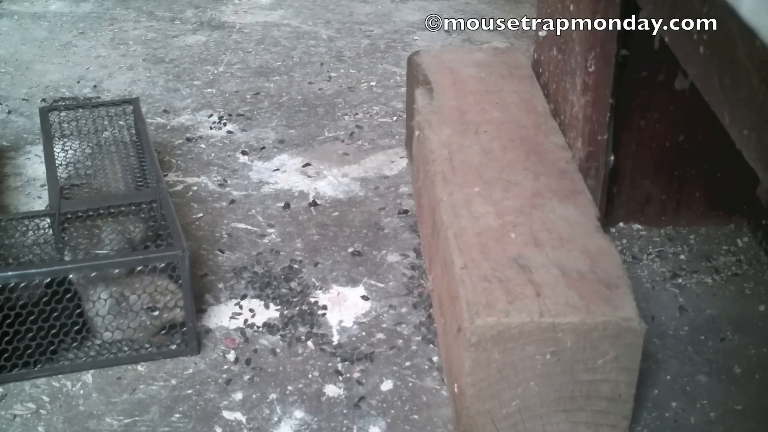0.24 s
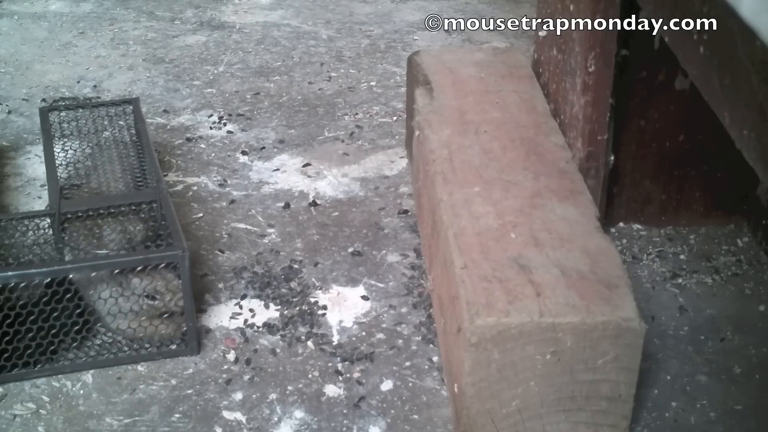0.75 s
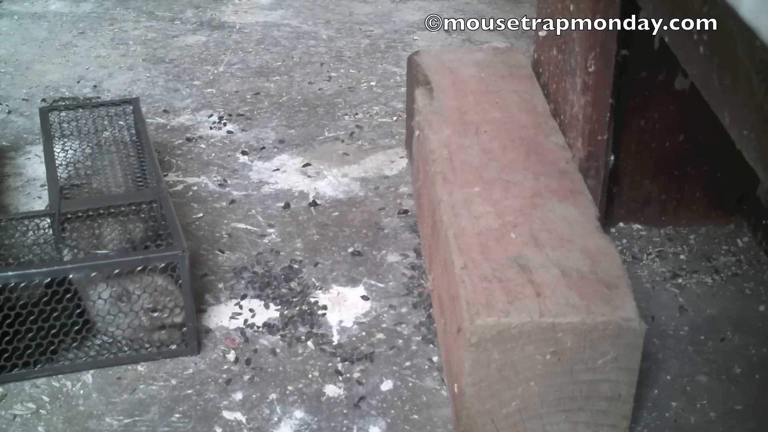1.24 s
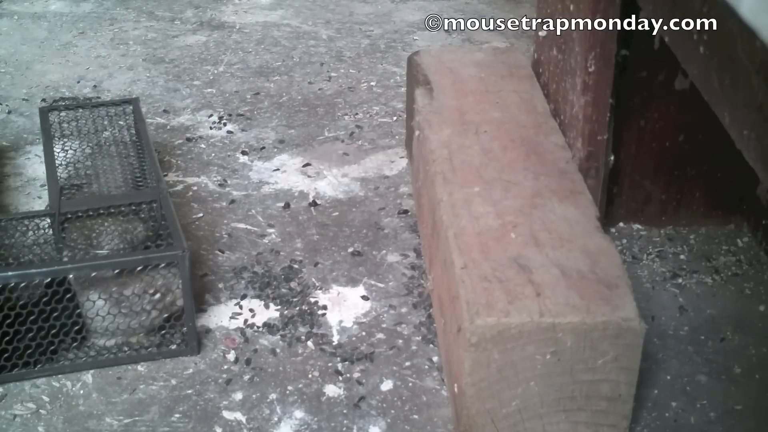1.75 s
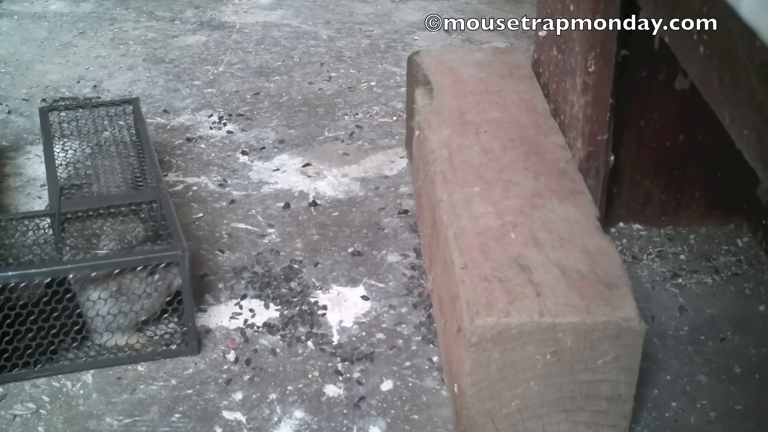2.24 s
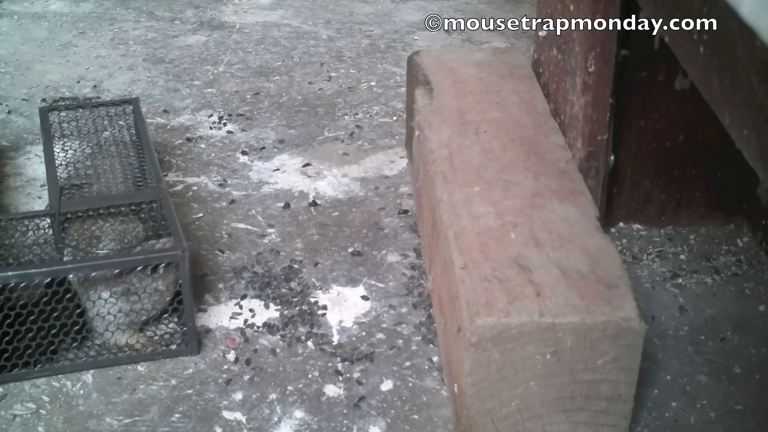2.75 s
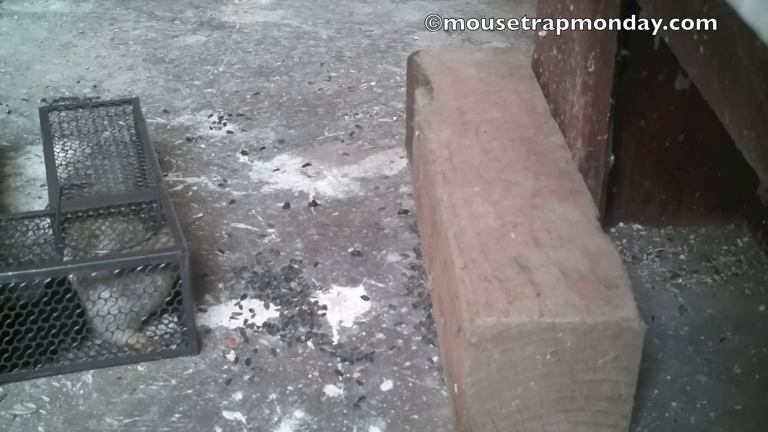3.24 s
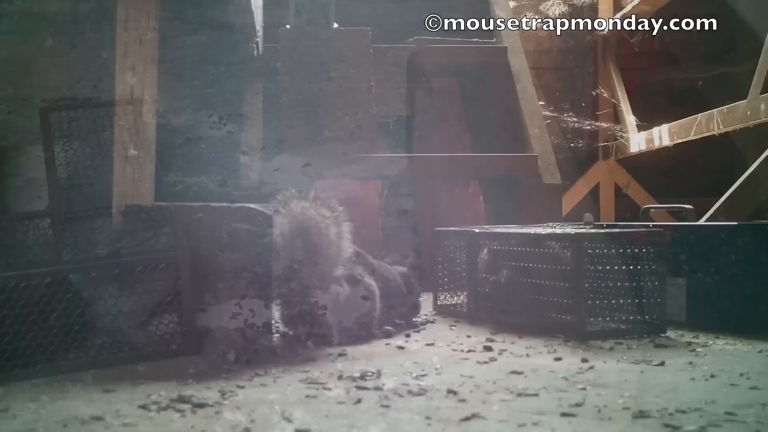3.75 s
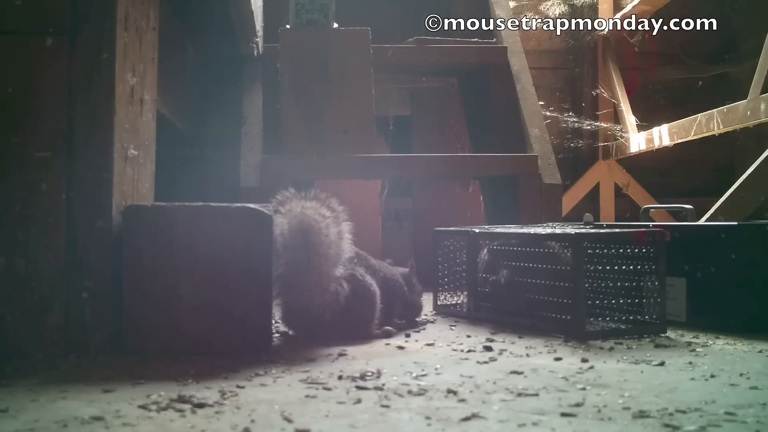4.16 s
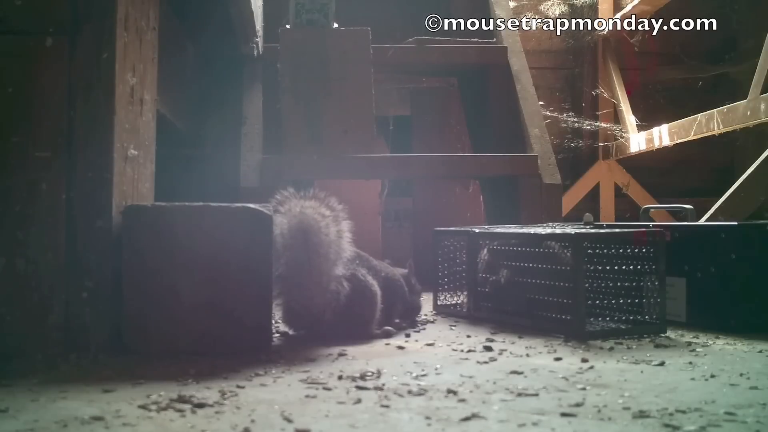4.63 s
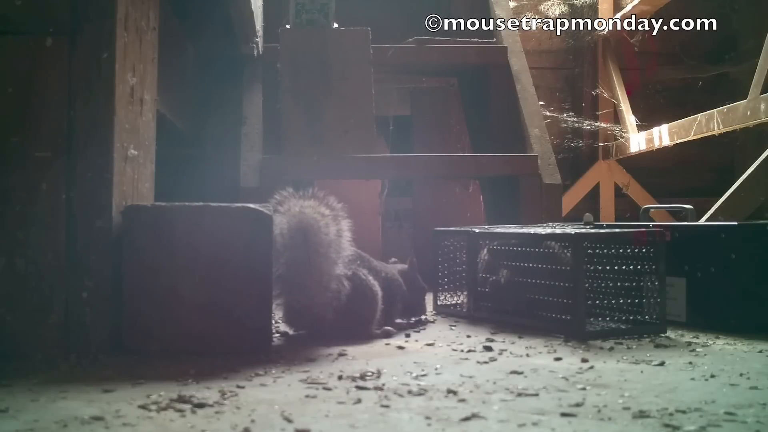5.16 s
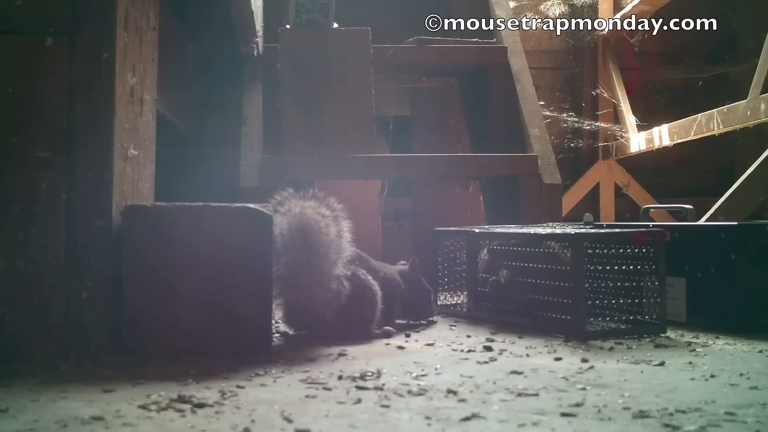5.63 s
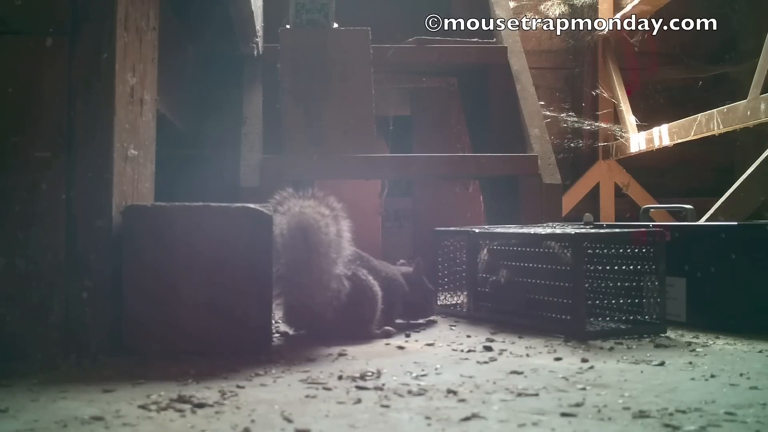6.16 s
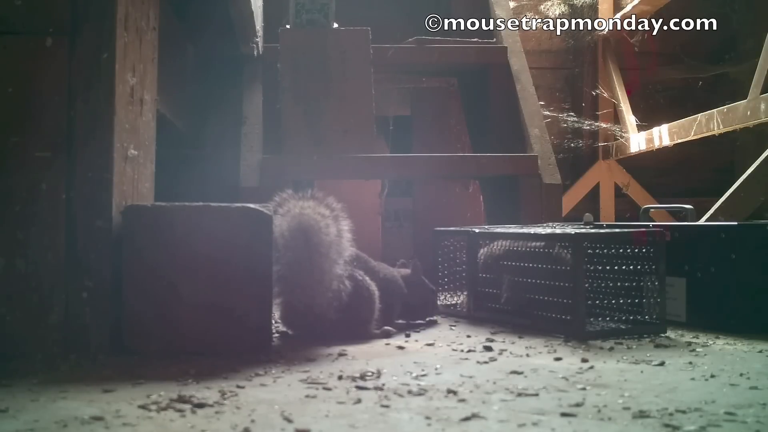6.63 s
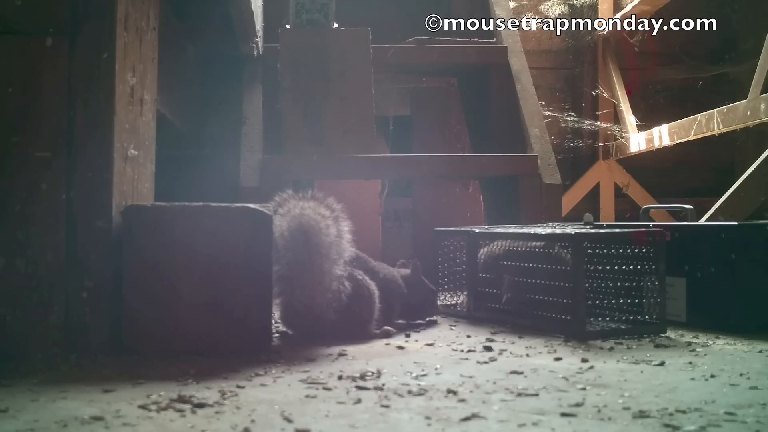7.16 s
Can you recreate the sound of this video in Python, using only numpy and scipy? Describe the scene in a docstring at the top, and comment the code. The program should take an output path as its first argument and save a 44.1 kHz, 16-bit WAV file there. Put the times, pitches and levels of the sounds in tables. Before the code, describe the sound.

A squirrel claws and rattles inside a wire-mesh trap in a barn, then another nibbles seeds over a faint engine hum and squeaks once sharply.

```python
"""Claws are heard first: a squirrel scrabbles in a wire-mesh trap, scratching mesh, ringing frame, thudding floor.
Noise bursts excite the spectra and damped modes of mesh, wires, frame and floor plate.
Then a squirrel nibbles seeds (noise snaps and stick-slip rasp) while a far engine hums as a few sine partials.
It gives one sharp squeak, a stepped tone with overtones. Decaying noise gives the barn's reverberation;
rumble and hiss lie beneath, and a limiter flattens the peaks."""
import sys
import numpy as np
from scipy import signal
from scipy.fft import rfft, irfft, next_fast_len
from scipy.io import wavfile
from scipy.ndimage import uniform_filter1d, minimum_filter1d, map_coordinates

SR = 44100
rng = np.random.default_rng(int(sys.argv[2]) if len(sys.argv) > 2 else 0)


def store_wav(level_fs):
    """Save 16-bit WAV to argv[1]."""
    pcm = np.round(np.clip(np.atleast_2d(level_fs), -1, 1) * 32767)
    wavfile.write(sys.argv[1], SR, pcm.T.astype(np.int16))


N = 325899  # samples

# Levels in the tables are relative: each source's mix gain follows in its function.
# Paw contacts: [t/s, grip level/dB, extra weight below 2.2 kHz/dB, slide/s]
PAW_CONTACTS = [(0.0, -51, 2, 0.0019), (0.0205, -49.5, -1.5, 0.0029), (0.051, -42, 0, 0.012),
                (0.1649, -49.5, -6, 0.0017), (0.185, -50, 3, 0.0029), (0.240, -41, 4, 0.02),
                (0.3034, -50.5, -2, 0.002), (0.343, -51, 1, 0.011), (0.365, -46.5, 2, .002),
                (0.4805, -66.5, 12.5, 0.0018), (0.544, -50, -8, 0.0021), (0.5619, -50, 2, .02),
                (0.6118, -41, -5.5, 0.0059), (0.645, -42.5, 2, .015), (0.7237, -52, 7.5, .012),
                (0.759, -49.5, 3, 0.0033), (0.7752, -43, 4, .002), (0.8282, -45.5, -3, 0.0033),
                (0.9043, -47.5, -2, 0.0095), (0.942, -37.5, -4, 0.00094), (1.0078, -45, -1.5, 0.0049),
                (1.0628, -46.5, -7, 0.0085), (1.109, -49, -4, 0.0041), (1.124, -49, 4, .002),
                (1.156, -41, -3, .008), (1.2009, -44.5, 0, 0.0011), (1.275, -52.5, 3, 0.0022),
                (1.3088, -44.5, 1.5, 0.0087), (1.3821, -55.5, 4.5, 0.0083), (1.745, -39, 4, .013),
                (2.0348, -62, -1.5, .002), (2.0637, -64, 0, 0.0017), (2.1165, -45, -1.5, .007),
                (2.388, -62.5, -15, 0.0077), (2.4539, -70, -1, 0.0019), (2.495, -56.5, 8, 0.018),
                (2.5806, -49.5, 0, 0.0021), (2.6762, -51.5, -14, 0.022), (2.738, -50, 6, 0.012),
                (2.775, -51.5, 4.5, 0.0028), (2.9352, -36, 1, 0.00092), (3.317, -58, 10.5, 0.0021),
                (3.347, -49.5, 5, 0.016), (3.4989, -57.5, 6.5, 0.011), (3.712, -59, 2.5, .004)]
# Spells of light brushing on the mesh: [start t/s, end t/s, middle level/dB]
BRUSHING_SPELLS = [(0, 1.401, -64), (1.4, 3.701, -74.5)]
# Spectral density of the wire mesh: [f/Hz, level/dB per Hz]
MESH_SPECTRUM = [(880, -45), (1500, -9.5), (1920, -19.5), (2150, -15), (2400, -15.5), (2750, -9),
                 (3800, -9.5), (5670, -3.5), (6250, -0.5), (7820, -6.5), (9140, -14), (14300, -32.5),
                 (15500, -27.5)]
# Damped modes of single wires: [f/Hz, width/Hz, level/dB]
WIRE_MODES = [(2810, 59, -6), (3300, 28, 2), (3467, 42, 3), (5340, 520, -3.5), (6340, 320, 2),
              (7590, 115, -5), (7940, 290, -15.5), (7720, 73, -30)]
# Damped modes of the steel frame: [f/Hz, width/Hz, level/dB]
FRAME_MODES = [(358, 19, -6.5), (425, 27, -9), (547, 44, -9), (884, 35, -5), (1298, 59, 0), (1545, 53, -11),
               (1720, 77, -5.5), (2160, 240, -4.5), (2660, 190, -11)]
# Landings of the body on the floor plate: [t/s, level/dB, extra depth at 245 Hz/dB]
LANDINGS = [(1.756, -52.5, 10.5), (2.123, -56, 4), (2.505, -61, 6), (2.587, -55, -3), (2.755, -57, 6),
            (2.94, -48.5, -5), (3.311, -59, 3), (3.36, -55, -4.5), (3.506, -61.5, 6.5), (3.713, -71, 6)]
# Spectral density of the floor plate: [f/Hz, level/dB per Hz]
FLOOR_SPECTRUM = [(150, -54.5), (205, -14), (242, -3.5), (285, -9), (335, 4.5), (420, -8), (470, -10.5),
                  (700, -19), (880, -12.5), (1100, -20.5), (3000, -36.5)]
# Cracking seed husks: [t/s, level/dB, crisp top relative to it/dB]
HUSK_CRACKS = [(3.9808, -52, -27), (4.165, -51, -14), (4.1712, -45, -9), (4.2098, -52, -22),
               (4.3126, -48, -16), (4.401, -42.5, -29), (4.446, -46.5, -17), (4.6265, -49, -10.5),
               (4.934, -43, -22), (4.9698, -39.5, -17), (5.002, -44.5, -16.5), (5.2829, -47, -19),
               (5.458, -48.5, -11), (5.5598, -47, -18), (5.8256, -45, -15), (6.6228, -43, -21.5),
               (6.8768, -51.5, -20), (6.988, -42.5, -28), (7.1852, -44, -24)]
# Spectral density of a husk snap: [f/Hz, level/dB per Hz]
HUSK_SPECTRUM = [(1470, -60.5), (2500, -18), (4790, -8), (5080, -15), (5390, -2), (5910, -10.5),
                 (6600, 1.5), (7780, -2), (8590, -9.5), (12000, -20), (15600, -37), (22000, -120)]
# Bouts of gnawing: [start t/s, end t/s, level/dB]
GNAWING_BOUTS = [(3.976, 3.998, -67.5), (4.343, 4.505, -70), (4.545, 4.65, -71.5), (4.803, 5.02, -72),
                 (5.127, 5.295, -72), (5.791, 5.825, -65), (5.903, 6.07, -67), (6.119, 6.339, -68.5),
                 (6.749, 6.772, -66), (6.979, 7.019, -66.5), (7.207, 7.247, -66.5)]
# Spectral density of teeth on seed: [f/Hz, level/dB per Hz]
RASP_SPECTRUM = [(2500, -29), (3500, -17), (4800, -11), (5500, -6), (6500, -1.5), (7400, -1.5), (8100, -12),
                 (9500, -19.5), (13000, -28)]
# Damped modes of the gnawed seed: [f/Hz, width/Hz, level/dB]
SEED_MODES = [(5660, 236, -1.5), (6800, 450, -2), (7300, 480, -4)]
# Bits dropping on the floor: [t/s, level/dB]
FALLING_CRUMBS = [(4.211, -80), (5.019, -73), (5.831, -67)]
# Overtones of the squeak: [multiple of the fundamental, level/dB]
SQUEAK_OVERTONES = [(2, -23.5), (3, -7), (4, -25)]
# Level course of the far engine: [t/s, level/dB]
ENGINE_LEVEL = [(3.68, -76), (3.86, -66.5), (4.2, -57), (5.65, -59), (5.87, -64.5), (6.8, -67), (7.39, -74)]
# Partials of the engine drone: [f/Hz, level/dB]
ENGINE_PARTIALS = [(112.5, 1.5), (225, -20.5), (295, -14), (333, -30.5), (450, -21.5)]
# Spectral density of the barn's quiet by the trap: [f/Hz, level/dB per Hz]
TRAP_AIR_SPECTRUM = [(12, -9), (20, -0.5), (47, -2.5), (166, -21), (207, -22.5), (306, -19.5), (342, -13),
                     (631, -30), (1270, -31), (3540, -39), (6190, -32), (7110, -35), (8400, -36),
                     (15500, -41.5)]
# Spectral density of the barn's quiet by the seeds: [f/Hz, level/dB per Hz]
SEED_AIR_SPECTRUM = [(12, -37), (20, 6.5), (122, -6), (144, -14), (171, -12), (225, -13.5), (452, -25),
                     (534, -22), (746, -24.5), (811, -26), (932, -26), (1580, -31.5), (5090, -33.5),
                     (10800, -28.5), (15500, -35.5)]
# Reverberation time of the barn: [f/Hz, t60/s]
BARN_T60 = [(200, 0.31), (1000, 1), (3600, 0.7), (5000, 0.55), (7000, 0.51), (14000, 0.24)]

TOP_HZ = 15500  # band limit
TRAP_AIR_DB, SEED_AIR_DB = -61.5, -63
TOUCH_DB = -2.5  # the first touch, against the grip
DRAG_S, DRAG_PER_SLIDE = .0015, .2  # swell of a contact, and its lengthening per second of slide
CLAW_T60_S = .11  # decay of a scratch
RATTLE_S, RATTLE_SPREAD_S = 0.021, .04  # delay of the mesh's knock-back, and its random extra
FIRM_DB = -43  # a firm grip, the reference for the knock-back
RATTLE_DB, RATTLE_WEIGHT_DB = -58.5, 7  # knock-back after a firm grip; its added weight makes it duller
RATTLE_FOLLOWS = .4  # dB of knock-back per dB of grip: the mesh has little play
CRISP_DB, CRISP_PER_WEIGHT = 0.5, 0.19  # claw treble at 11 kHz, and its gain per dB of weight
BRUSH_RANGE_DB, BRUSH_SHAKE_DB = 17, 8  # range of brush levels; their drive of the frame
SETTLE_S, SETTLE_DB = .06, -11  # the weight settles after each landing
STROKES_PER_S, STROKE_DEPTH_DB = 14.83, 8.5  # tooth strokes, and the fall in level through each
CHIP_DB, CHIP_SPREAD_DB, CHIP_TOP_DB = -58, 2.5, -17.5  # chip level, scatter, relative crisp top
SQUEAK_S, SQUEAK_LENGTH_S, SQUEAK_DB = 6.351, 0.061, -14.5  # start, length, reference level
SQUEAK_ATTACK_S, SQUEAK_RELEASE_S = .005, 0.0067
LOW_HZ, HIGH_HZ = 3434, 3730  # mean pitches of the two steps
STEP_AFTER_S, STEP_GLIDE_S = .0215, .0042  # centre of the pitch step, and time constant of its glide
MOUTH_LEAD_S, WHISPER_DB = .011, -40  # the mouth opens first, with a faint whistle


def cage():
    """Forced vibration: paw contacts excite mesh and wires, and the frame stores the shaking longer."""
    brushes = fidget()
    mesh = colour(brushes, MESH_SPECTRUM)
    chatter = np.zeros(N)
    shake = amp(BRUSH_SHAKE_DB) * brushes
    hz = np.linspace(300, TOP_HZ, num=90)
    tick_treble_db = along([(5000, 0), (13000, 6)], hz)
    for s, db, weight_db, drag in contacts():
        crisp_db = CRISP_DB + CRISP_PER_WEIGHT * weight_db
        scratch = amp(db) * burst(rise=drag, t60=CLAW_T60_S, grain_db=1.0)
        sudden = np.exp(-drag / 0.0026)  # a quick claw starts with a hard tick
        tick = amp(db + 2) * sudden * burst(rise=.0008, t60=.035, grain_db=2)
        touch_db = along([(2200, weight_db), (6000, 0), (11000, crisp_db)], hz)
        patch_db = 3.6 * rng.standard_normal(len(hz))  # every patch favours other wire modes
        tone = along(MESH_SPECTRUM, hz) + touch_db + patch_db
        add(mesh, s, amp(-1.5) * colour(scratch, np.c_[hz, tone], size=2048))
        add(mesh, s + 0.0011, colour(tick, np.c_[hz, tone + tick_treble_db], size=2048))
        add(mesh, s + drag, amp(db - 2.5) * pluck(t60=0.071))
        add(chatter, s, scratch)
        add(shake, s, amp(db + weight_db) * burst(rise=0.011, t60=0.21, grain_db=3.0))
    return mesh + amp(-8) * ring(chatter, WIRE_MODES) + amp(-22) * frame(shake)


def contacts():
    """Impact sequence: a paw touches, slides and grips, then the mesh knocks back: (s, dB, weight dB, drag s)."""
    for (s, db, weight_db, slide), chance in zip(PAW_CONTACTS, rng.random(len(PAW_CONTACTS))):
        drag = DRAG_S + DRAG_PER_SLIDE * slide
        yield s, db + TOUCH_DB, weight_db, drag
        yield s + slide, db, weight_db, drag
        knock_s = s + slide + RATTLE_S + RATTLE_SPREAD_S * chance
        knock_db = RATTLE_DB + RATTLE_FOLLOWS * (db - FIRM_DB)
        yield knock_s, knock_db, weight_db + RATTLE_WEIGHT_DB, drag


def fidget(count=28):
    """Light friction: short noise bursts of random time and level fill each brushing spell."""
    touches = np.zeros(N)
    for start, end, db in BRUSHING_SPELLS:
        for when, strength in rng.random((count, 2)):
            brush = burst(rise=.003, t60=0.06, grain_db=3.5)
            brush_db = db + BRUSH_RANGE_DB * (strength - .5)
            add(touches, start + when * (end - start), amp(brush_db) * brush)
    return touches


def pluck(t60, count=9):
    """Free vibration: a few wires of unequal pitch, released at once, decay together."""
    t = np.arange(SR // 8) / SR
    hz = np.clip(5600 * np.exp(0.27 * rng.standard_normal((count, 1))), 2400, 12000)
    size = amp(.5 * along(MESH_SPECTRUM, hz) + rng.normal(0, 4.5, hz.shape))
    waves = size * np.sin(2 * np.pi * (hz * t + rng.random(hz.shape)))
    envelope = amp(-60 * t / t60) * (1 - np.exp(-t / 0.00024))
    return waves.sum(0) / np.linalg.norm(size) * envelope


def frame(shake):
    """Modal resonance: the shaken steel frame rings in modes whose levels wander independently."""
    modes = np.zeros(N)
    for hz, width, db in FRAME_MODES:
        modes += amp(db + 2.54 * wobble(13)) * ring(shake, [(hz, width, 0)])
    low_cut = signal.butter(4, 260, "highpass", fs=SR, output="sos")
    return signal.sosfilt(low_cut, modes)  # thin bars radiate no bass


def thumps():
    """Plate radiation: the floor plate booms under the landing weight; a flat landing sounds deeper."""
    plate = np.zeros(N)
    hz, plate_db = np.transpose(FLOOR_SPECTRUM)
    for s, db, depth_db in LANDINGS:
        tone = np.c_[hz, plate_db + along([(190, 0), (245, depth_db), (350, 0)], hz)]
        for delay, loss_db in [(0, 0), (SETTLE_S, SETTLE_DB)]:
            blow = burst(rise=0.004, t60=0.36, grain_db=0.5)
            add(plate, s + delay, amp(db + loss_db) * colour(blow, tone, size=4096))
    return plate


def nibbling():
    """Fracture and stick-slip: husks snap in brief bursts over a resonant rasp; a few bits drop."""
    snaps, crisp, drops = np.zeros(N), np.zeros(N), np.zeros(N)
    for s, db, top_db in [*HUSK_CRACKS, *chips()]:
        add(snaps, s, amp(db - 12.5) * burst(rise=0.00026, t60=0.03, grain_db=-1))
        splinter = burst(rise=.0002, t60=.014, grain_db=3)
        add(crisp, s, amp(db + top_db + 5.5) * splinter)
    for s, db in FALLING_CRUMBS:
        add(drops, s, amp(db) * burst(rise=.001, t60=.06, grain_db=3))
    slips = amp(3 * wobble(200) + 3.5 * wobble(900))
    grains = gnawing_effort() * unit(slips * rng.standard_normal(N))  # the teeth stick and slip
    rasp = amp(-1.0) * colour(grains, RASP_SPECTRUM) + amp(-7.5) * ring(grains, SEED_MODES)
    crisp_top = colour(crisp, [(2000, -17), (8000, 6), (11000, -0.5), (15000, -7.5)])
    husks = colour(snaps, HUSK_SPECTRUM) + crisp_top
    crumbs = colour(drops, [(600, -33), (1400, 9.0), (3000, -3.5), (6000, -14.0), (12000, -14)])
    return rasp + husks + crumbs


def gnawing_effort():
    """Amplitude modulation: within a bout the teeth bite and ease off in regular strokes."""
    t, effort = np.arange(N) / SR, np.zeros(N)
    for start, end, db in GNAWING_BOUTS:
        gate = np.clip(np.minimum(t - start, end - t) / 0.0031, 0, 1)
        ease = (STROKES_PER_S * (t - start) % 1) ** 2
        effort += gate * amp(db - STROKE_DEPTH_DB * ease)
    return effort


def chips(count=10):
    """Brittle fracture: a chip breaks off early in each stroke: (s, level dB, crisp top dB)."""
    for start, end, _ in GNAWING_BOUTS:
        times = start + (np.arange(count) + rng.random(count) / 2) / STROKES_PER_S
        levels = CHIP_DB + CHIP_SPREAD_DB * rng.standard_normal(count)
        yield from [(s, db, CHIP_TOP_DB) for s, db in zip(times, levels) if s < end]


def squeak():
    """Harmonic source: a whistled note steps up and roughens; its partials reach the room unequally."""
    hz, db = voice()
    upper_step = np.clip((hz - hz.min()) / np.ptp(hz), 0, 1)  # 0 on the lower step, 1 on the upper
    phase = 2 * np.pi * np.cumsum(hz * (1 + 0.0075 * upper_step * wobble(700))) / SR
    # overtones follow the squeak's level and are weaker on the upper step
    overtone_gain = amp((db - db.max()) / 2 - 4.9 * upper_step)
    note = amp(db - 1.0) * np.sin(phase)
    overtones = []
    for multiple, level in SQUEAK_OVERTONES:
        gain = amp(db + level + 4.4 * upper_step * wobble(350)) * overtone_gain
        overtones.append(gain * np.sin(round(multiple) * phase))
    second, *higher = overtones
    hiss_shape = [(1500, -19.5), (2900, -10.5), (3800, -6.5), (9000, -1.5), (15000, -10.5)]
    hiss = amp(db - 36.5) * colour(rng.standard_normal(N), hiss_shape)
    # low noise that follows the squeak's level
    rumble_shape = [(20, 3.0), (50, -3.5), (90, -17.5), (200, -25.5), (900, -38.5), (3000, -57.5)]
    rumble = amp(db - 26.5) * colour(rng.standard_normal(N), rumble_shape)
    # a faint low tone near 548 Hz under the upper step
    low_tone = amp(db - 43) * upper_step * ring(rng.standard_normal(N), [(548, 150, 0)])
    clicks = np.zeros(N)  # the mouth opens, then the voice snaps in
    opening = burst(rise=.0003, t60=0.042, grain_db=3.0)
    opening = colour(opening, [(1000, -9.5), (3500, -4.0), (9000, 1.0), (15000, -19)])
    add(clicks, SQUEAK_S - MOUTH_LEAD_S, amp(-52) * opening)
    snap = burst(rise=.0002, t60=0.0068, grain_db=8.5)
    snap = colour(snap, [(2500, -32), (6000, -9.5), (13000, 0.5)])
    add(clicks, SQUEAK_S + SQUEAK_ATTACK_S / 2, amp(-44) * snap)
    spread = note + hiss + amp(6.5) * second + amp(-22.5) * sum(higher)  # what excites the room
    direct = note + second + sum(higher) + hiss + rumble + low_tone + clicks
    return direct + barn(spread, early_db=-10.5, tail_db=-26.5)


def voice():
    """Pitch (Hz) and envelope (dB) of the squeak: faint lead-in, attack, hold, release and one step up."""
    t = np.arange(N) / SR - SQUEAK_S
    step = (1 + np.tanh((t - STEP_AFTER_S) / STEP_GLIDE_S)) / 2
    attack = np.clip(t / SQUEAK_ATTACK_S, 0, 1) ** 2
    release = np.clip((SQUEAK_LENGTH_S - t) / SQUEAK_RELEASE_S, 0, 1)
    gain = np.maximum(attack, amp(WHISPER_DB) * (t > -MOUTH_LEAD_S)) * release
    return LOW_HZ + (HIGH_HZ - LOW_HZ) * step, SQUEAK_DB + 20 * np.log10(gain + 1e-9)


def engine():
    """Periodic source: a far drone of partials shares one slightly unsteady rotation."""
    db, = curves(ENGINE_LEVEL)
    turns = np.cumsum(1 + 0.00701 * wobble(4.6)) / SR
    drone = np.zeros(N)
    for hz, level in ENGINE_PARTIALS:
        drone += amp(level + 1.2 * wobble(1.965)) * np.sin(2 * np.pi * hz * turns)
    return amp(db - 4) * drone


def background():
    """Equal-power crossfade of filtered noise: the quiet by the trap dissolves into that by the seeds."""
    blend, = curves([(3.55, 0.019), (3.95, 0.94)])
    by_trap = amp(TRAP_AIR_DB) * unit(colour(rng.standard_normal(N), TRAP_AIR_SPECTRUM))
    by_seeds = amp(SEED_AIR_DB) * unit(colour(rng.standard_normal(N), SEED_AIR_SPECTRUM))
    return np.sqrt(1 - blend) * by_trap + np.sqrt(blend) * (by_seeds + engine())


def barn(x, early_db, tail_db):
    """Reverberation: near boards answer first, then a noise tail with frequency-dependent decay."""
    hz, t, z = signal.stft(rng.standard_normal(SR), SR, nperseg=256)
    decay = amp(-60 * t / along(BARN_T60, hz)[:, None])
    tail = signal.istft(z * decay, SR, nperseg=256)[1]
    early = burst(rise=0.0041, t60=0.11, grain_db=2.0)
    response = np.zeros(SR)
    add(response, .004, amp(early_db) * early / np.linalg.norm(early))
    add(response, .015, amp(tail_db) * tail / np.linalg.norm(tail))
    return signal.fftconvolve(x, response)[:N]


def burst(rise, t60, grain_db):
    """Granular friction: a swelling, decaying flurry of uneven noise, about rms 1 at its height."""
    t = np.arange(SR // 4) / SR
    shape = (1 - np.exp(-t / max(rise, 1e-4))) * amp(-60 * t / t60)
    catches = unit(uniform_filter1d(rng.standard_normal(len(t)), size=40))
    return shape / shape.max() * unit(amp(grain_db * catches) * rng.standard_normal(len(t)))


def ring(x, modes):
    """Modal superposition: pass x through damped (Hz, width, dB) modes, of unit energy together."""
    t = np.arange(SR // 3) / SR
    response = np.zeros(len(t))
    for hz, width, db in modes:
        response += amp(db) * width * np.exp(-np.pi * width * t) * np.sin(2 * np.pi * hz * t)
    return signal.fftconvolve(x, response / np.linalg.norm(response))[:N]


def colour(x, spectrum, size=16384):
    """Minimum-phase filtering: a causal filter of unit energy with the given (Hz, dB) shape."""
    cepstrum = irfft(np.log(amp(along(spectrum, np.fft.rfftfreq(size, 1 / SR))) + 1e-6))
    cepstrum[1:size // 2] *= 2  # fold the cepstrum to make the response causal
    cepstrum[size // 2 + 1:] = 0
    response = irfft(np.exp(rfft(cepstrum)))
    return signal.fftconvolve(x, response / np.linalg.norm(response))[:N]


def amp(db):
    """Logarithmic level: decibels to amplitude gain."""
    return 10 ** (np.asarray(db) / 20)


def unit(x):
    """Normalisation: scale to rms 1."""
    return x / np.sqrt(np.mean(x ** 2) + 1e-20)


def along(points, hz):
    """Interpolation: read (Hz, value) points on a logarithmic frequency axis."""
    f, v = np.transpose(points)
    return np.interp(np.log(hz + 1), np.log(f + 1), v)


def curves(rows):
    """Interpolation in time: one value per sample for each column after the time."""
    s, *cols = np.transpose(rows)
    return [np.interp(np.arange(N) / SR, s, c) for c in cols]


def wobble(rate):
    """Random modulation: a smooth curve with rate knots a second."""
    return map_coordinates(rng.standard_normal(int(N * rate / SR) + 4), [np.arange(N) * rate / SR])


def add(track, s, sound):
    """Superposition: mix a sound into the track at s seconds."""
    part = track[max(round(s * SR), 0):][:len(sound)]
    part += sound[:len(part)]


def scene():
    """Superposition of all direct sources and the barn's response, in one channel."""
    trap, seeds = cage() + thumps(), nibbling()
    trap_room = barn(trap, early_db=-10, tail_db=-22.5)
    seed_room = barn(seeds, early_db=-26.5, tail_db=-10.5)
    return (trap + seeds + squeak() + trap_room + seed_room + background())[None]


def record(dry):
    """Gain reduction and band limiting: a fast limiter holds the peaks, then a low-pass cuts at TOP_HZ."""
    needed = np.minimum(1, amp(-20.5) / (np.abs(dry) + 1e-9))
    gain = uniform_filter1d(minimum_filter1d(needed, size=90), size=60)
    size = next_fast_len(N + SR // 2)
    passband = np.fft.rfftfreq(size, 1 / SR) < TOP_HZ
    return irfft(rfft(dry * gain, size) * passband, size)[:, :N]


dry = scene()
out = record(dry)
store_wav(out)
```